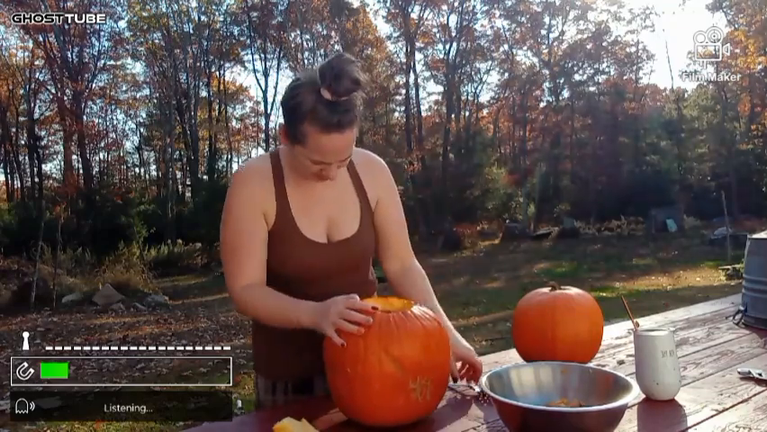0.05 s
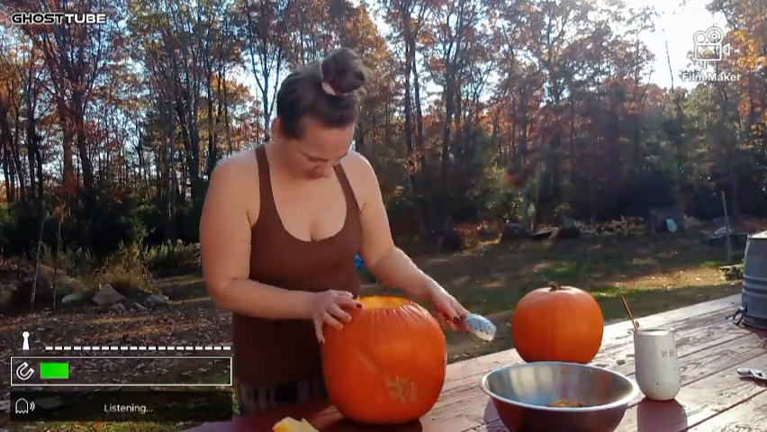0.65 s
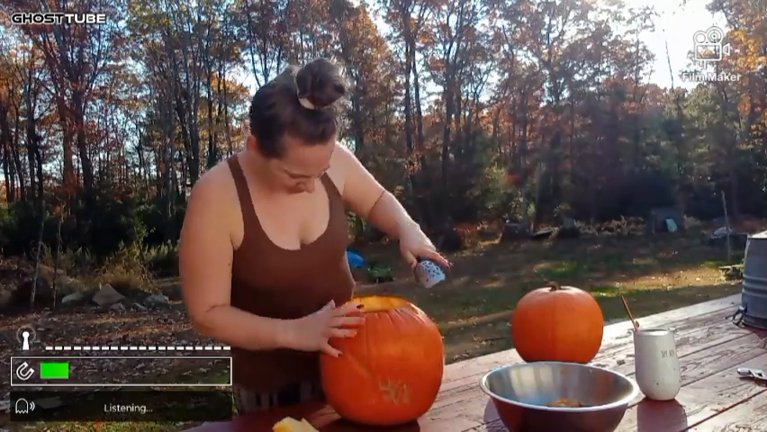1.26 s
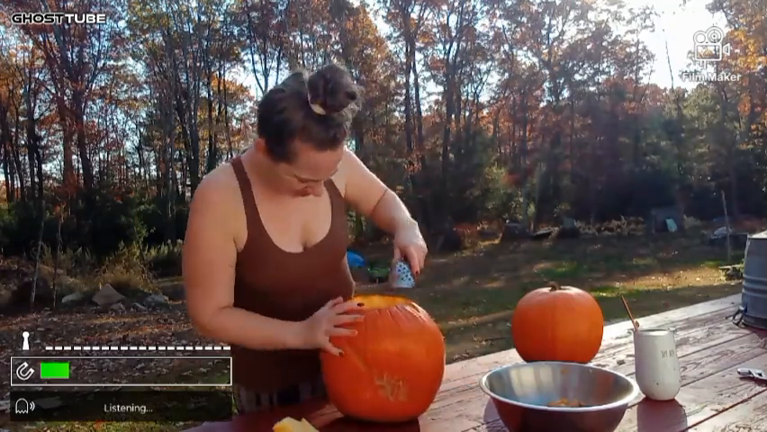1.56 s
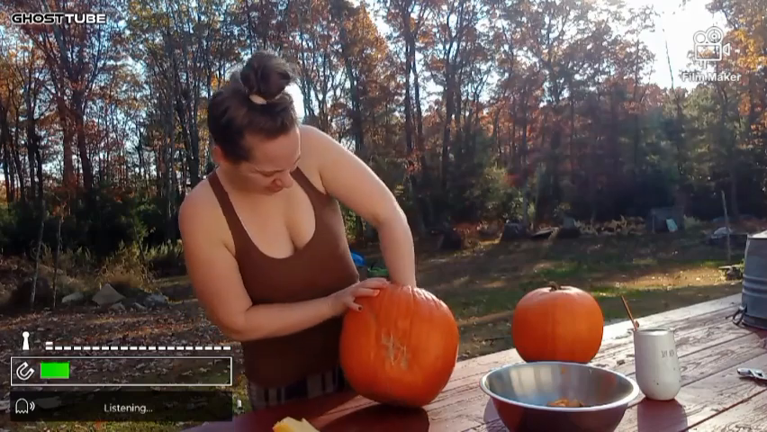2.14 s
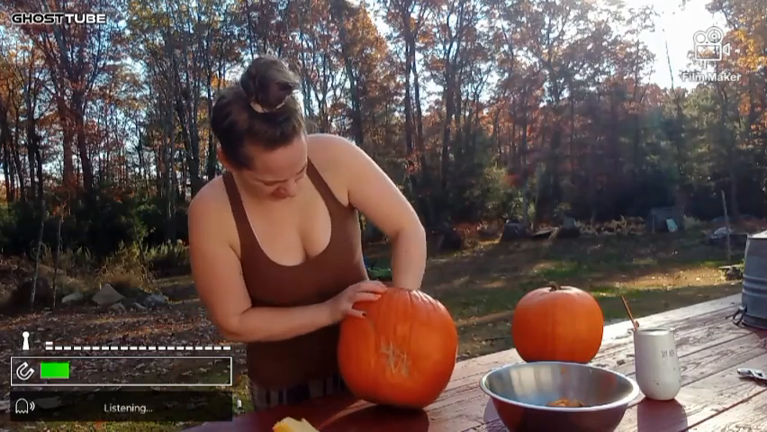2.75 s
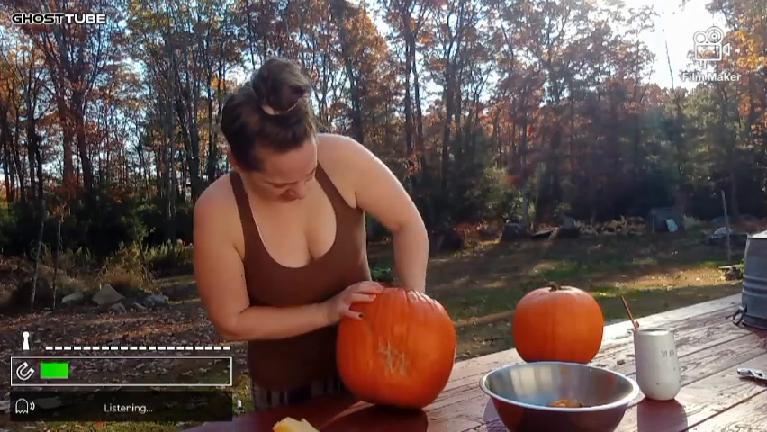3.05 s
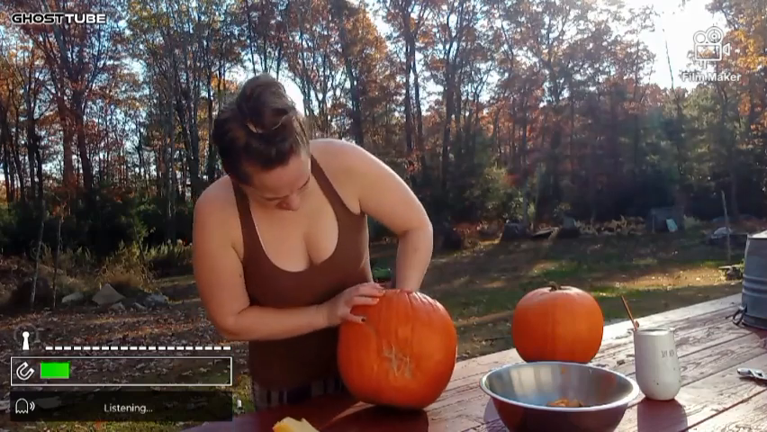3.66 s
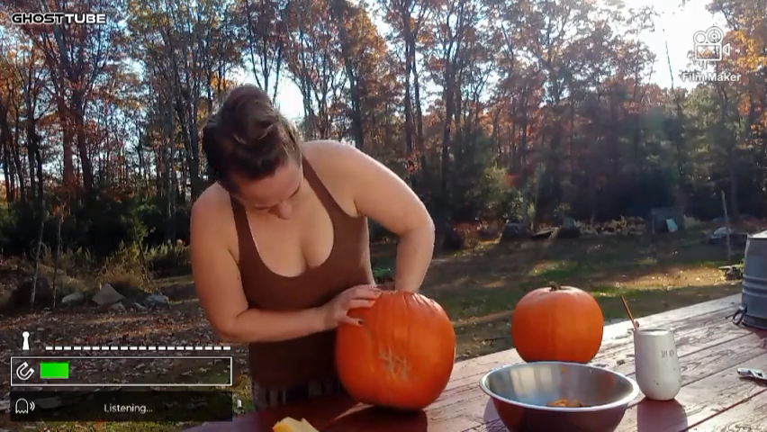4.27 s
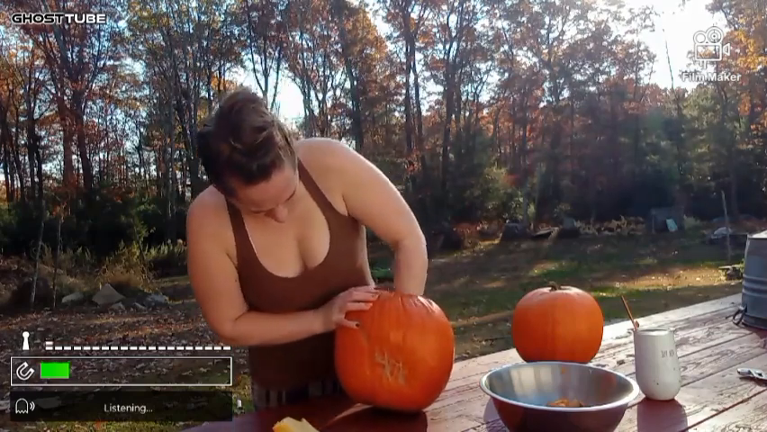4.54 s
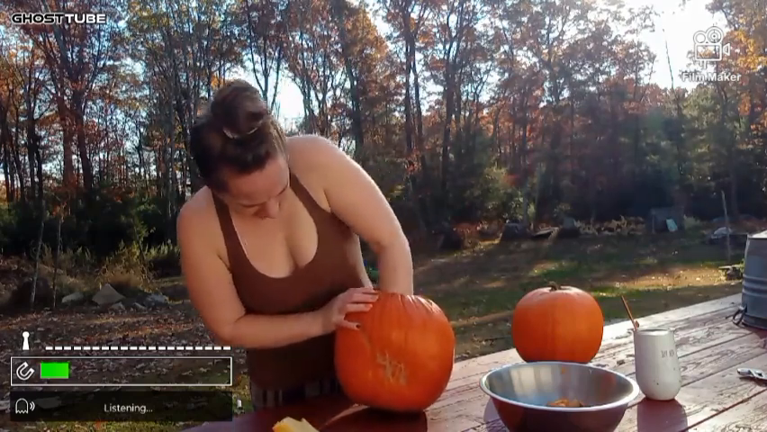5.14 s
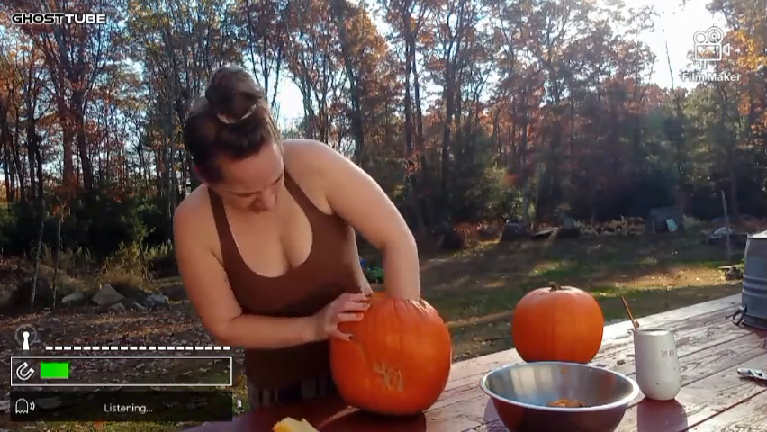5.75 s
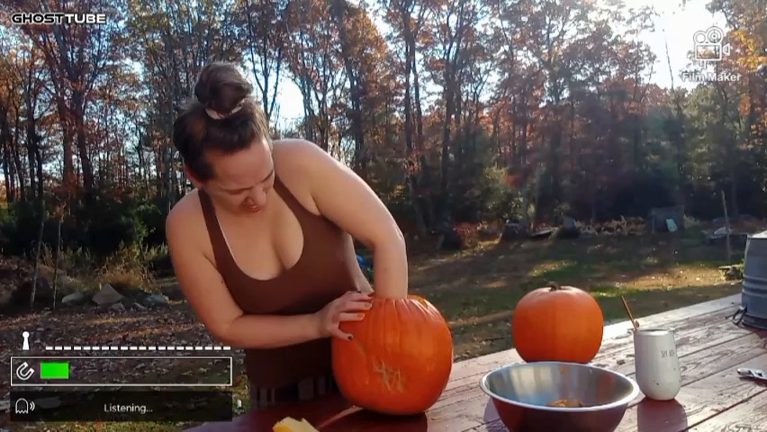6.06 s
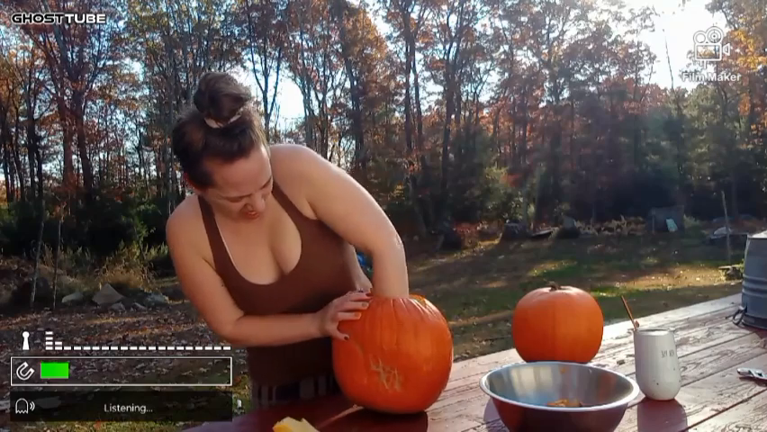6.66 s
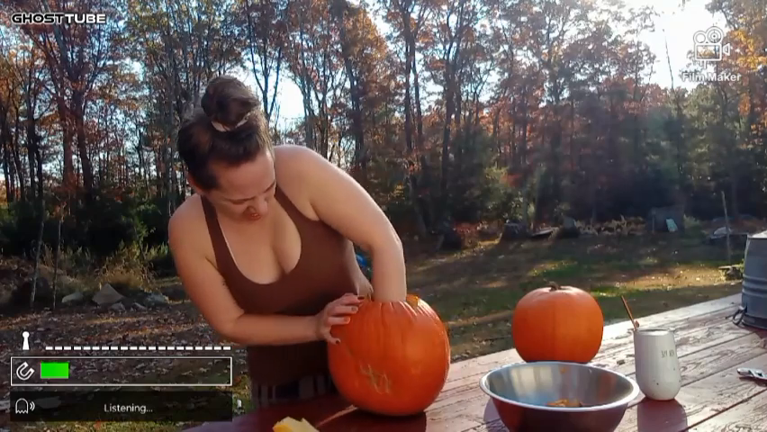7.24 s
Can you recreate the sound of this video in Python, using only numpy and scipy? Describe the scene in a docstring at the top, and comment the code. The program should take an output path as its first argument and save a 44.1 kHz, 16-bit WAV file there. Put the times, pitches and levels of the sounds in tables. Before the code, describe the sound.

Hollow thumps and wet scraping of a metal scoop inside a pumpkin, with distant crows cawing in quiet outdoor air.

```python
"""Scraping out a pumpkin by the woods.

A metal scoop clinks off a wooden table and rasps through wet pulp; small bubbles pop. Blows on the wall
boom in the cavity, some rebound, and the table groans. Crow caws, faint whistles, a bird-like squeak, a
low drone; background noise ducks and recovers. All arrives twice, about 1 ms apart, a little hollow."""
import sys
import numpy as np
from scipy import signal
from scipy.fft import rfft, irfft
from scipy.io import wavfile

SR = 44100
rng = np.random.default_rng(int(sys.argv[2]) if len(sys.argv) > 2 else 0)


def unload_audio(sound):
    """Save the sound as a 16-bit wav file, at the path given as the first command line argument."""
    columns = np.transpose(np.atleast_2d(sound))
    # keep every value between -1 and 1, then stretch to whole-number steps
    steps = np.round(np.clip(columns, -1, 1) * 32767)
    wavfile.write(sys.argv[1], SR, steps.astype(np.int16))


N = 326340
TIME = np.arange(N) / SR
FREQS = np.fft.rfftfreq(N, 1 / SR)


def amp(db):
    """Decibels to gain."""
    return 10 ** (np.asarray(db) / 20)


def unit(x):
    """Scale to rms 1."""
    return x / np.sqrt(np.mean(x ** 2) + 1e-20)


def gain_at(spectrum, hz):
    """Gain of an (f/Hz, level/dB) curve, interpolated over log frequency."""
    f, db = np.transpose(spectrum)
    return amp(np.interp(np.log(hz + 1), np.log(f), db))


def colour(x, spectrum):
    """Filter by a spectrum, to rms 1."""
    return unit(irfft(rfft(x) * gain_at(spectrum, FREQS), N))


def lowpass(x, hz):
    """Zero-phase low-pass, 24 dB per octave."""
    return irfft(rfft(x) / (1 + (FREQS / hz) ** 4), N)


def wander(rate_hz):
    """Smooth random motion, rms 1."""
    return unit(lowpass(rng.standard_normal(N), rate_hz))


def resonate(x, hz, width_hz):
    """One resonance applied twice for steep skirts, to rms 1."""
    b, a = signal.iirpeak(hz, hz / width_hz, SR)
    return unit(signal.lfilter(b, a, signal.lfilter(b, a, x)))


def ring(t, hz, t60_s):
    """One decaying mode."""
    return np.sin(2 * np.pi * hz * t) * amp(-60 * t / t60_s)


def add(mix, at_s, sound):
    """Mix a sound in, cropped to fit."""
    start = round(at_s * SR)
    sound = sound[max(-start, 0):]
    part = mix[max(start, 0):][:len(sound)]
    part += sound[:len(part)]


# Outdoor noise spectrum: f/Hz, level/dB
AIR_SPECTRUM = [(25, -10), (50, 3), (83, -8), (115, 11.5), (170, -6.5), (250, -2), (420, -2), (700, -5.5),
                (1000, -10), (2000, -14.5), (3300, -12.5), (6400, -16), (8500, -31), (15500, -33.5)]
# Background level contour: t/s, level/dB
BACKGROUND_LEVEL = [(0.0, -71.5), (0.33, -78), (0.54, -72.5), (0.84, -73), (1.42, -79), (1.65, -78.5),
                    (1.89, -70.5), (2.16, -71), (2.95, -76), (3.46, -75), (4.16, -82.5), (4.59, -78),
                    (4.82, -68), (5.77, -84), (5.87, -74.5), (6.26, -79.5), (6.66, -72), (7.4, -76.5)]


def air(level_db=-69, hiss_follow=0.59, rumble_follow=0.5):
    """Outdoor hiss and rumble duck and recover."""
    times_s, db = np.transpose(BACKGROUND_LEVEL)
    shift_db = np.interp(TIME, times_s, db - np.median(db))
    noise = colour(rng.standard_normal(N), AIR_SPECTRUM)
    rumble = lowpass(noise, hz=500)
    hiss = noise - rumble
    return amp(level_db) * (rumble * amp(rumble_follow * shift_db) + hiss * amp(hiss_follow * shift_db))


# Drone partials: f/Hz, level/dB
DRONE_PARTIALS = [(83, -82), (166, -77.5)]


def drone():
    """Two faint low tones, each wavering at random."""
    return sum(amp(db) * wander(rate_hz=5.2) * np.sqrt(2) * np.sin(2 * np.pi * hz * TIME)
               for hz, db in DRONE_PARTIALS)


# Caws: t/s, length/s, level/dB, top pitch f/Hz
CAWS = [(-.05, 0.13, -54.5, 486), (0.315, 0.13, -56.5, 460.4), (.632, 0.16, -52.5, 517),
        (1.104, 0.12, -52.5, 497), (1.9, 0.15, -52.5, 475), (2.34, 0.15, -55, 484.6),
        (2.91, 0.17, -53.5, 481), (6.21, 0.089, -60.5, 510), (6.529, 0.12, -55.5, 497),
        (6.801, 0.0916, -48, 504.5), (7.083, .1, -54, 509), (7.356, 0.089, -56, 499)]
# Throat response: f/Hz, level/dB
CROW_THROAT = [(450, -58), (950, -26), (1200, -1.5), (1400, 11), (1650, 3.5), (1900, -14.5), (2400, -27.5),
               (3500, -23)]


def crow(jitter=0.026, top_at=0.39, rise=0.1184, drop=0.171):
    """Hoarse harmonic caws; the pitch arches and drops under a steady throat resonance."""
    out, shake, flutter, waver = np.zeros(N), wander(160), wander(200), wander(23)
    for at_s, length_s, db, top_hz in CAWS:
        t = TIME[:int(length_s * SR)]
        span = (max(int(at_s * SR), 0) + np.arange(len(t))) % N
        progress = t / length_s
        droop = rise * np.maximum(1 - progress / top_at, 0) ** 2
        droop += drop * np.maximum((progress - top_at) / (1 - top_at), 0)
        pitch_hz = top_hz * (1 - droop + jitter * shake[span])
        phase = 2 * np.pi * np.cumsum(pitch_hz) / SR
        voice = sum(gain_at(CROW_THROAT, k * pitch_hz) * np.sin(k * phase) for k in range(1, 8))
        voice *= 1 + 0.28 * flutter[span] + 0.22 * waver[span]
        effort = np.interp(progress, [0, 0.12, 0.35, 0.65, 0.85, 1], [0, 0.6, 1, 1, 0.55, 0])
        add(out, at_s, amp(db) * unit(voice * effort))
    return out


# Scrapes and narrow-band squeals; the 2-3 kHz one near 6.8 s is a bird-like call or squeak:
# peak t/s, length/s, rasp level/dB, hiss level/dB, squeal f/Hz, squeal level/dB
STROKES = [(0.39, .3, -67, -79, 1726, -54), (0.473, 0.68, -105, -102, 5020, -68),
           (1.787, 0.032, -69, -88, 520, -49), (2.747, 0.022, -55, -66, 1830, -59.5),
           (3.249, 0.082, -64, -70.5, 822.5, -68), (3.472, 0.1, -62, -61, 3190, -54),
           (3.497, 0.084, -52, -77, 745, -51.5), (3.78, 0.078, -91, -79, 800, -73),
           (3.916, 0.066, -57, -69.5, 1080, -64.5), (4.025, 0.064, -63, -78, 715, -61),
           (4.065, 0.035, -48, -54.5, 885, -53), (4.297, 0.17, -71.5, -85, 1070, -90),
           (4.446, 0.16, -68.5, -78, 840, -74), (4.546, 0.079, -66, -71.5, 2130, -74),
           (4.693, 0.08, -73, -79, 850, -67), (4.74, 0.057, -57.5, -75, 1990, -67),
           (4.918, 0.02, -82, -87, 1028, -66.5), (5.08, 0.14, -70.5, -85, 1303, -62),
           (5.196, 0.11, -64, -83, 2290, -73), (5.463, 0.19, -61, -79, 956, -64.5),
           (5.736, 0.087, -66.5, -85, 730, -68), (5.857, 0.045, -74, -79, 2300, -65),
           (5.957, 0.14, -62, -78, 2150, -73.5), (6.03, .12, -71, -76, 835, -67),
           (6.512, 0.034, -64, -81, 653, -57.5), (6.595, 0.061, -55.5, -77, 2060, -73),
           (6.668, 0.13, -63, -96, 2547, -59.5), (6.805, 0.28, -99, -96, 2090, -64),
           (6.848, 0.21, -100, -95, 2720, -60.5), (7.106, 0.054, -70, -76, 810, -75),
           (7.19, 0.077, -47, -63.5, 442, -44)]
# Spectra of tearing fibres, wet hiss and the hollow wall: f/Hz, level/dB
RASP_SPECTRUM = [(200, -39), (450, 4.5), (650, 4.5), (900, -2), (1300, -5.5), (2100, -6.5), (3200, -11.5),
                 (5000, -10), (7000, -17), (10000, -58.5)]
HISS_SPECTRUM = [(1500, -17), (3200, -17.5), (6300, 11.5), (8000, -6.5), (10000, 3), (13000, -5),
                 (15500, 8), (17000, -20)]
WALL_SPECTRUM = [(60, -55), (115, 0.5), (150, -8), (215, 6.5), (270, 3.5), (340, -10), (500, -29.5),
                 (900, -50.5)]


def scraping(drum_db=4, judder_db=3, clump_db=1.2, bubble_db=-4, drag_rasp_db=-15):
    """Strokes tear fibres, squeeze juice and drum on the wall; most squeals are scoop chatter."""
    rasp, hiss, squeal = np.zeros((3, N))
    grit = slips(per_s=1500, spread_db=0.33)
    for peak_s, length_s, rasp_db, hiss_db, hz, squeal_db in STROKES:
        span, push = stroke(peak_s, length_s)
        rasp[span] += amp(rasp_db) * push
        hiss[span] += amp(hiss_db) * push
        squeal[span] += amp(squeal_db) * push * resonate(grit[span], hz, width_hz=0.2 * hz)
    judder = amp(judder_db * np.tanh(wander(67)) + clump_db * np.tanh(wander(20)))
    drag = dragging()
    fibres = (rasp + amp(drag_rasp_db) * drag) * colour(grit, RASP_SPECTRUM)
    crackle = slips(per_s=2500, spread_db=3.2)
    juice = hiss * (colour(crackle, HISS_SPECTRUM) + amp(bubble_db) * bubbles())
    wall = (drag + amp(drum_db) * rasp) * colour(slips(per_s=900, spread_db=1.5), WALL_SPECTRUM)
    return judder * (fibres + juice + squeal) + wall


def slips(per_s, spread_db):
    """Random stick-slip clicks of uneven size."""
    size = amp(spread_db * np.minimum(rng.exponential(1, N), 4))
    return size * rng.standard_normal(N) * (rng.random(N) < per_s / SR)


def stroke(peak_s, length_s, build_share=0.45):
    """Span and envelope of a push and release, within 20 dB of its peak for length_s."""
    build_s, release_s = build_share * length_s, (1 - build_share) * length_s
    span = slice(max(int((peak_s - 3 * build_s) * SR), 0), int((peak_s + 3 * release_s) * SR))
    t = TIME[span] - peak_s
    return span, amp(-20 * np.maximum(-t / build_s, t / release_s))


def bubbles(per_s=9, t60_cycles=60):
    """Tiny bubbles of 14 sizes bursting in the pulp, rms 1."""
    t = TIME[:SR // 20]
    bursts = (signal.oaconvolve(slips(per_s, spread_db=0.84), ring(t, hz, t60_cycles / hz))[:N]
              for hz in np.geomspace(2000, 14000, 14))
    return unit(sum(bursts))


# Hand pressure along the wall: t/s, level/dB
HAND_PRESSURE = [(1.65, -82), (2.1, -74), (2.55, -65), (3.6, -64.5), (4.1, -84), (4.5, -77), (5.1, -65),
                 (5.4, -90), (6.15, -73), (6.4, -65), (7.4, -85)]


def dragging(uneven_db=3.5, slide_db=-59.5, slide_s=0.13, slide_follow=0.27, lead_s=0.063, lift_db=11):
    """Rubbing envelope: uneven pressure, a slide around each blow, a lift before strong ones."""
    pressure_db = np.interp(TIME, *np.transpose(HAND_PRESSURE)) + uneven_db * wander(17)
    slides = np.zeros(N)
    for at_s, db, *_ in BLOWS:
        span, push = stroke(at_s, slide_s)
        slides[span] += amp(slide_db + slide_follow * (db - MEDIAN_BLOW_DB)) * push
        if db > MEDIAN_BLOW_DB:
            span, lift = stroke(at_s - lead_s, slide_s)
            pressure_db[span] -= lift_db * lift
    return amp(pressure_db) + slides


# Bird whistles: t/s, length/s, level/dB, f/Hz
WHISTLES = [(0.358, 0.18, -73, 4690), (0.527, 0.202, -79, 4245), (1.601, 0.13, -74, 3134),
            (1.973, 0.18, -67, 2988), (1.993, 0.29, -78.5, 4380), (2.432, 0.27, -81, 4260),
            (2.57, 0.053, -70, 2905), (4.512, 0.23, -79.5, 4240), (5.34, 0.19, -69.5, 3850),
            (6.748, 0.074, -57.5, 3970)]


def birds(glide=0.02, warble=0.021):
    """Thin, unsteady whistles that fall slightly."""
    out, shake = np.zeros(N), wander(210)
    for at_s, length_s, db, hz in WHISTLES:
        progress = np.linspace(0, 1, int(length_s * SR))
        pitch_hz = hz * (1 + glide * (0.5 - progress) + warble * shake[int(at_s * SR):][:len(progress)])
        phase = 2 * np.pi * np.cumsum(pitch_hz) / SR
        add(out, at_s, amp(db) * np.sin(np.pi * progress) * np.sin(phase))
    return out


# Table board modes: f/Hz, width/Hz, level/dB
BOARD_MODES = [(243, 100, -7.5), (414, 130, -3), (660, 73, -1), (955, 85, -4.5), (1165, 220, -4)]


def pickup(knock_s=0.375, knock_db=-49, clink_s=0.411, clink_db=-54.5):
    """The scoop chatters on the boards, then its edge clinks free."""
    out, t = np.zeros(N), TIME[:SR // 8]
    chatter = rng.standard_normal(len(t)) * np.exp(-t / 0.02)
    knock = sum(amp(db) * resonate(chatter, hz, width_hz) for hz, width_hz, db in BOARD_MODES)
    clink = colour(rng.standard_normal(N), HISS_SPECTRUM)[:len(t)] * np.exp(-t / 0.013)
    add(out, knock_s, amp(knock_db) * unit(knock))
    add(out, clink_s, amp(clink_db) * clink)
    return out


# Ticks and wet pops: t/s, level/dB, f/Hz, t60/s
POPS = [(0.413, -57.5, 3050, 0.13), (3.029, -58, 14540, 0.059), (3.469, -58, 3210, 0.12),
        (3.507, -48, 4130, 0.019), (3.758, -63.5, 10060, 0.061), (3.914, -69, 8420, 0.1),
        (4.063, -52.5, 7560, 0.041), (4.535, -60, 14700, 0.017), (5.132, -57, 8880, 0.0069),
        (5.487, -62, 7780, 0.014), (6.068, -47, 6450, 0.025), (6.655, -62, 11300, .015)]


def pops(snap_db=-6, snap_decay_s=0.0061):
    """A tiny snap with a short high ring."""
    out, t = np.zeros(N), TIME[:SR // 8]
    for at_s, db, hz, t60_s in POPS:
        snap = np.diff(rng.standard_normal(len(t) + 1)) / 2 * np.exp(-t / snap_decay_s)
        add(out, at_s, amp(db) * (ring(t, hz, t60_s) + amp(snap_db) * snap))
    return out


# Shifts of the pumpkin's weight: t/s, level/dB, f/Hz
WEIGHT_SHIFTS = [(0.931, -67, 82), (1.19, -62, 82.5), (1.68, -64, 85), (1.782, -56, 88), (2.087, -57, 130),
                 (2.361, -58.5, 158), (2.519, -58, 146), (3.151, -63, 121), (5.663, -58, 111.2)]


def rocking(rise_s=0.035, ragged=0.47):
    """The table answers a shift of weight with a soft, uneven groan."""
    out, t, shake = np.zeros(N), TIME[:SR // 2], wander(52)
    for at_s, db, hz in WEIGHT_SHIFTS:
        push = t / rise_s * np.exp(1 - t / rise_s)
        tremor = 1 + ragged * shake[int(at_s * SR):][:len(t)]
        add(out, at_s, amp(db) * push * tremor * np.sin(2 * np.pi * hz * t))
    return out


# Pumpkin wall modes: ratio to cavity pitch, level/dB, t60 factor
WALL_MODES = [(1.2, -23.5, .9), (1.45, -2, 0.17), (1.72, -33.5, 1), (2.0, -33.5, 0.63), (3.401, -57, 0.85)]
# Scoop blows on the wall: t/s, level/dB, cavity f/Hz, hardness/dB, rebound gain
BLOWS = [(1.77, -22.5, 235.7, -7, 0), (1.829, -43.5, 199, 1, 0.3), (2.032, -37, 222.5, -5.5, 1),
         (2.223, -48, 214.5, 3, 1), (2.718, -22.5, 244, -3, 0.63), (2.7566, -19.5, 232, 5, 0),
         (2.853, -57, 237, -7, 0), (2.895, -33, 231, -13.5, 0.16), (3.121, -27.5, 219, -3, 0.04),
         (3.234, -34.5, 215.4, -0.5, 0.58), (3.486, -31, 215, 4.5, 0.56), (3.698, -33, 229, -8, 0),
         (3.739, -31.5, 244.4, 2.5, 0.2), (3.756, -31, 219, 6, 0.49), (4.064, -18, 206, 0.5, 0.12),
         (4.354, -41.5, 230.5, -4, 0.1), (4.474, -35.5, 230, 8.5, 0), (4.557, -34.5, 224.6, 0, 0.17),
         (4.678, -45, 224, 3.5, 0), (4.732, -29.5, 233, 2.5, 0), (4.917, -18, 225.1, 5, 0.32),
         (5.024, -51, 228, 9, 0.2), (5.076, -28.5, 215, 9.5, 0), (5.479, -32, 211.3, -1, 0.77),
         (5.661, -26, 233.5, -1.5, 0), (5.724, -40.5, 191, -7, 0.26), (6.03, -45, 210, 0, 1),
         (6.07, -39.5, 236.5, -15, 0.05), (6.384, -34, 207.6, -25, 0.4), (6.603, -28, 220.4, -2.5, 0),
         (6.688, -37.5, 208.5, 3.5, 0), (6.942, -47.5, 208, -8, 0.6), (7.067, -26.5, 211, -6, 0.62),
         (7.185, -39.5, 215.2, -7, 0), (7.203, -28, 213, -1, 0.55)]
MEDIAN_BLOW_DB = np.median([db for _, db, *_ in BLOWS])


def blows(t60_s=0.069, sag=0.12, wall_db=5, crush_db=-14.5, rebound_s=0.02044, rebound_follow=0.096):
    """Soft flesh yields slowly, so the cavity boom swells; a hard edge rings and crushes the wall."""
    out, t = np.zeros(N), TIME[:SR // 2]
    swell = 1 - np.exp(-(t / 0.0097) ** 3)
    wall_swell = 1 - np.exp(-(t / 0.0047) ** 2)
    table = amp(-28.5) * swell * ring(t, hz=110.6, t60_s=0.23)
    for at_s, db, hz, hard_db, rebound in BLOWS:
        pitch_hz = hz * (1 + sag * (np.exp(-t / 0.16) - 0.5))  # sinks as the push relaxes
        wall = sum(amp(mode_db) * ring(t, hz * ratio, t60_s * life)
                   for ratio, mode_db, life in WALL_MODES)
        boom = swell * ring(t, pitch_hz, t60_s) + amp(wall_db + hard_db) * wall_swell * wall
        flesh = resonate(rng.standard_normal(len(t)), hz=315, width_hz=103)
        crush = amp(crush_db + hard_db) * wall_swell * np.exp(-t / 0.01) * flesh
        blow = amp(db) * (boom / abs(boom).max() + crush + table)
        add(out, at_s, blow)
        # A loosely held scoop skips; a stronger blow throws it further, so it lands later.
        flight_s = rebound_s * amp(rebound_follow * (db - MEDIAN_BLOW_DB))
        add(out, at_s + flight_s, rebound * blow)
    return out


def woods(x, t60_s, tail_db, echo_db, echo_s=0.11, scatter_db=-7, scatter_s=0.033):
    """Trunks smear a far sound and leave a tail; the edge of the trees returns one echo."""
    t = TIME[:SR]
    tail = amp(tail_db) * unit(rng.standard_normal(SR) * amp(-60 * t / t60_s))
    scatter = amp(scatter_db) * unit(rng.standard_normal(SR) * np.exp(-t / scatter_s))
    response = (tail + scatter) / np.sqrt(SR)
    response[0] += 1  # direct path
    add(response, echo_s, amp([echo_db]))
    return signal.fftconvolve(x, response)[:N]


def scene():
    """The pumpkin close by, the birds far away; mono."""
    near = blows() + rocking() + scraping() + pops() + pickup()
    caws = woods(crow(), t60_s=0.8, tail_db=-15, echo_db=-16)
    whistles = woods(birds(), t60_s=0.77, tail_db=5, echo_db=-9)
    return (near + caws + whistles + drone() + air())[None]


def record(dry, copy_gain=0.89, delay_s=0.000925, gain_db=-1, low_cut_hz=70, high_cut_hz=16000):
    """A close delayed copy carves evenly spaced notches; then a wind filter and the band limit."""
    comb = 1 + copy_gain * np.exp(-2j * np.pi * FREQS * delay_s)
    hollow = amp(gain_db) * irfft(rfft(dry) * comb, N)
    wind_filter = signal.butter(2, low_cut_hz, "high", fs=SR, output="sos")
    band_limit = signal.firwin(511, high_cut_hz, window=("kaiser", 9), fs=SR)
    return signal.oaconvolve(signal.sosfilt(wind_filter, hollow), band_limit[None], "same")


dry = scene()
out = record(dry)
unload_audio(out)
```